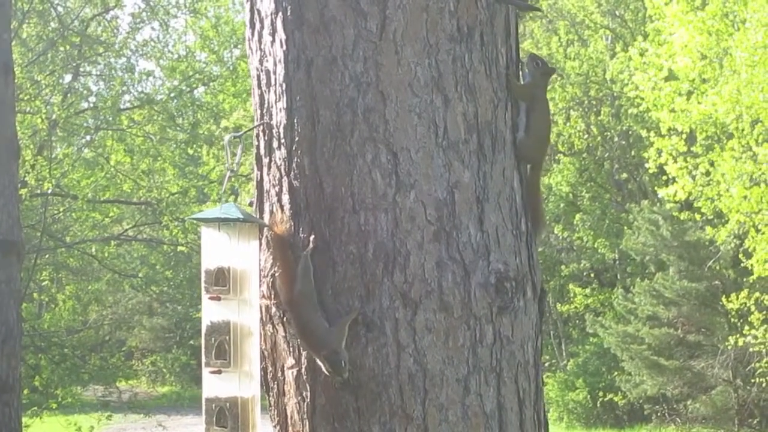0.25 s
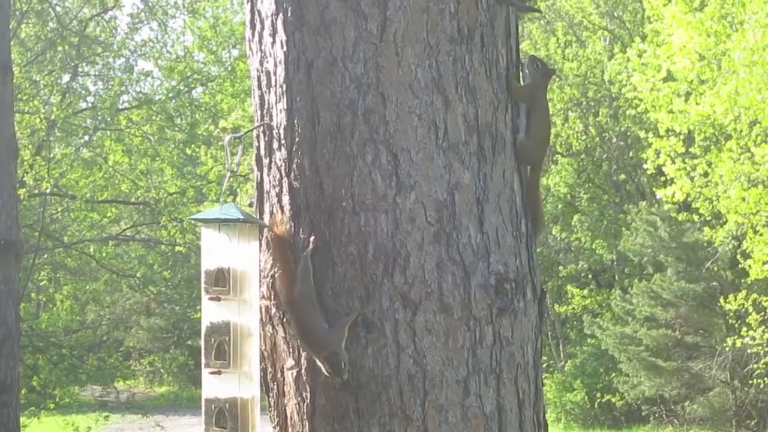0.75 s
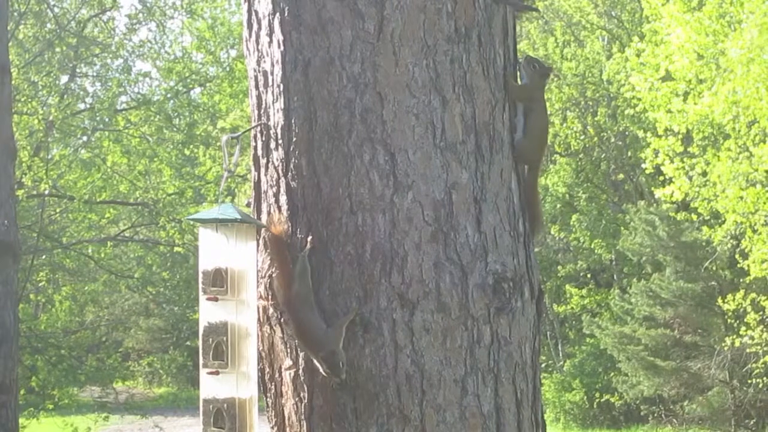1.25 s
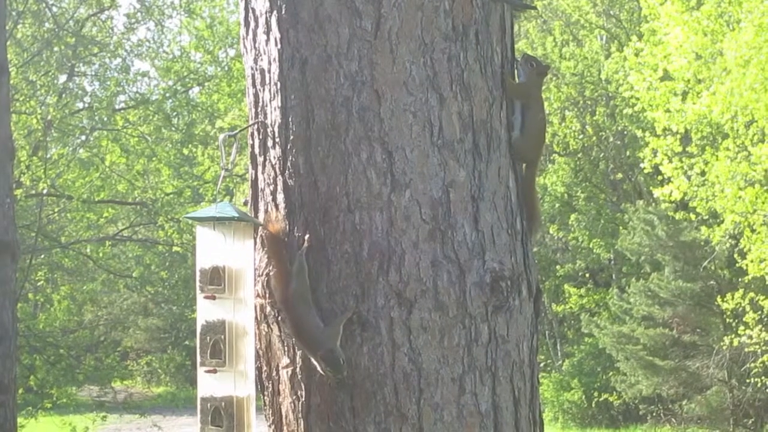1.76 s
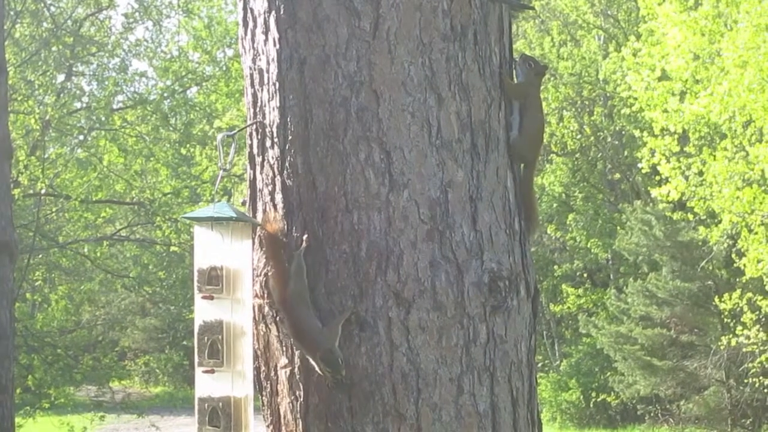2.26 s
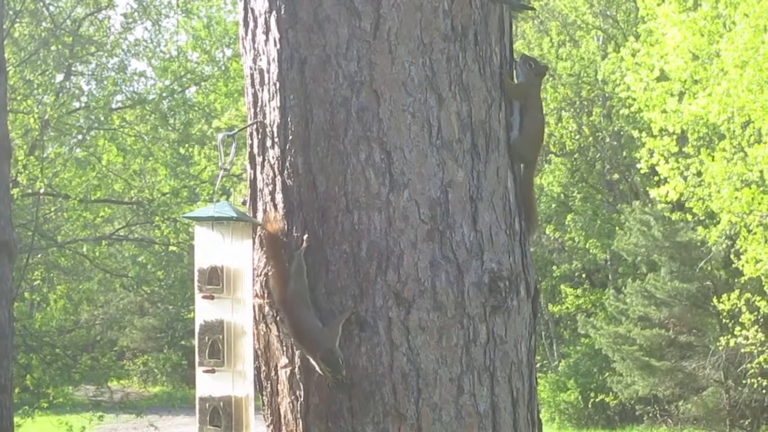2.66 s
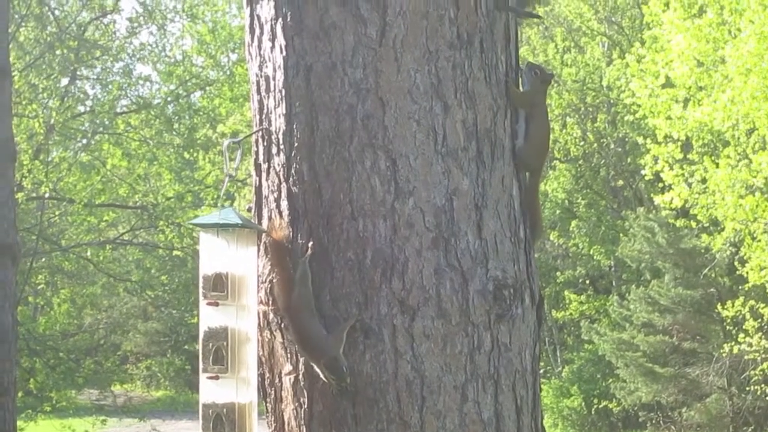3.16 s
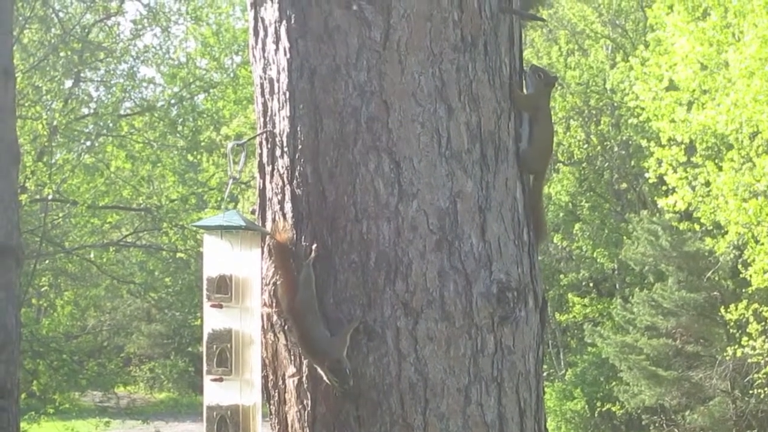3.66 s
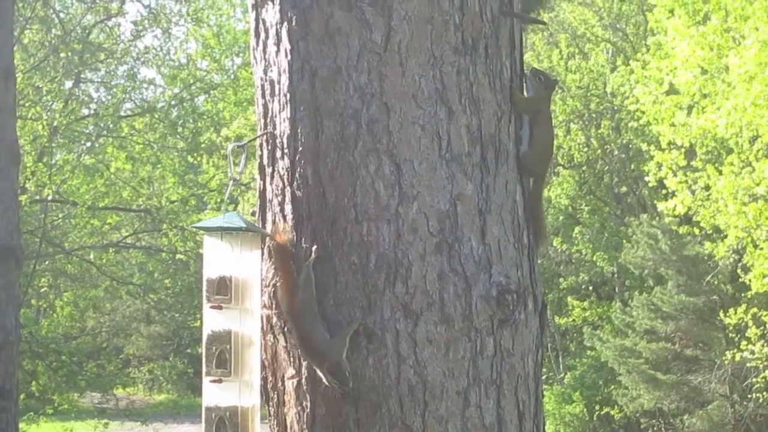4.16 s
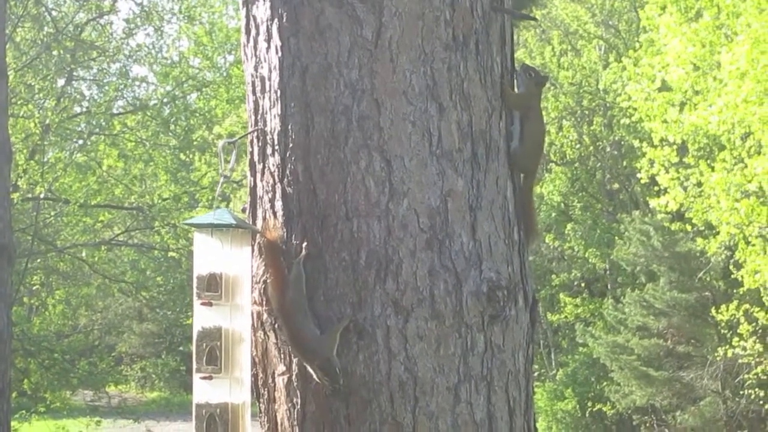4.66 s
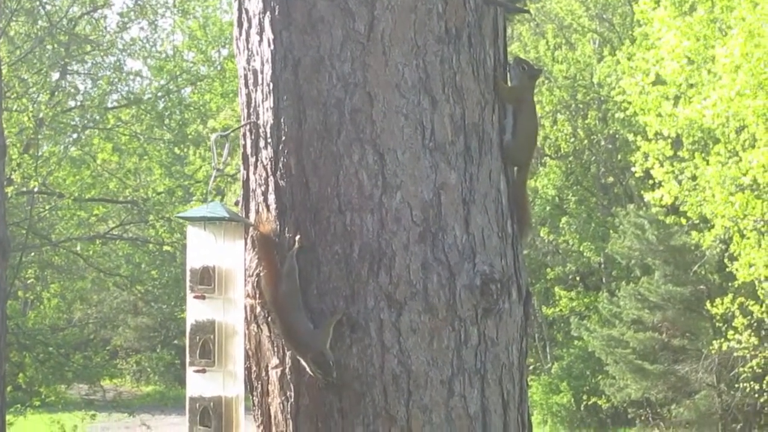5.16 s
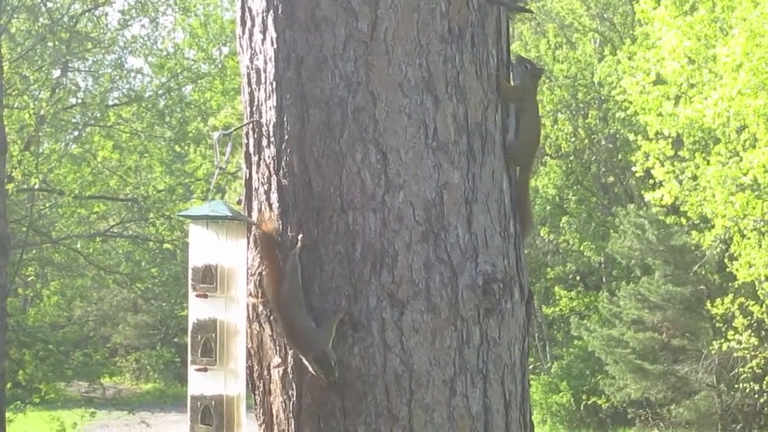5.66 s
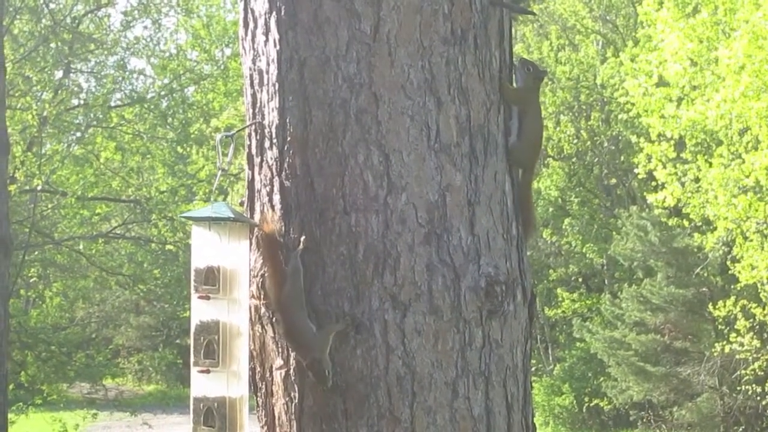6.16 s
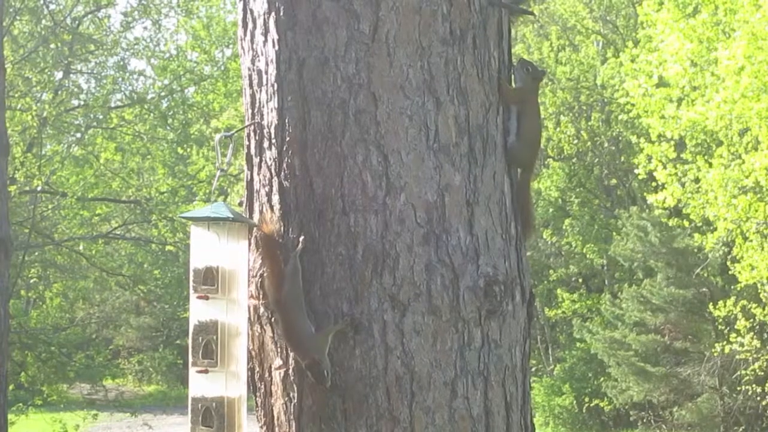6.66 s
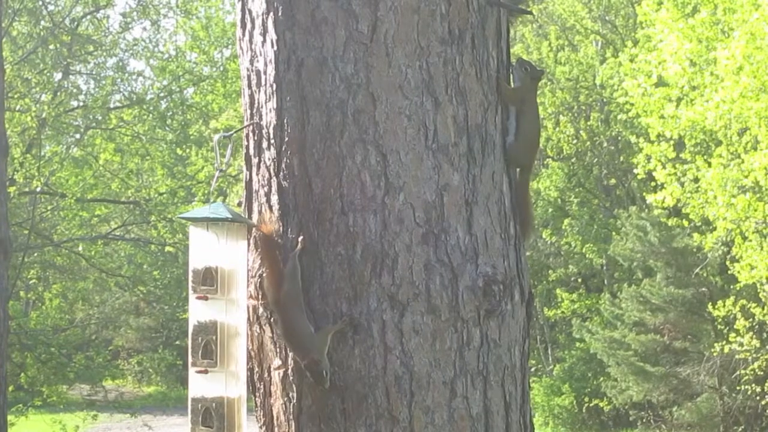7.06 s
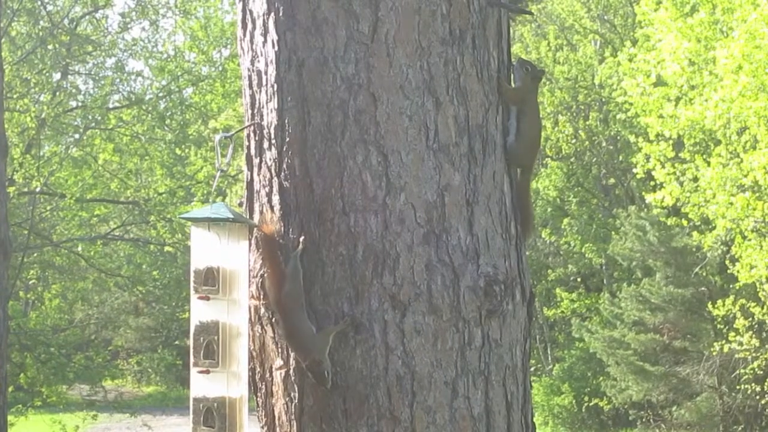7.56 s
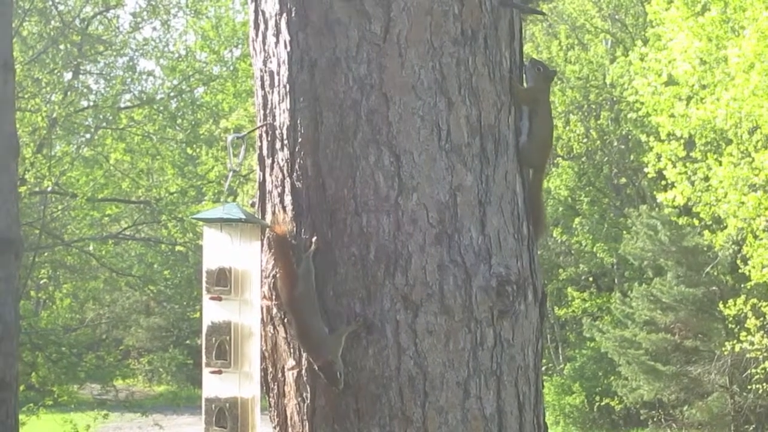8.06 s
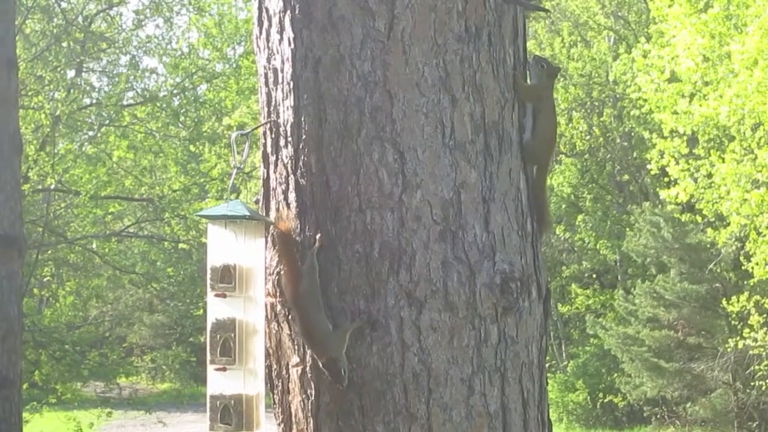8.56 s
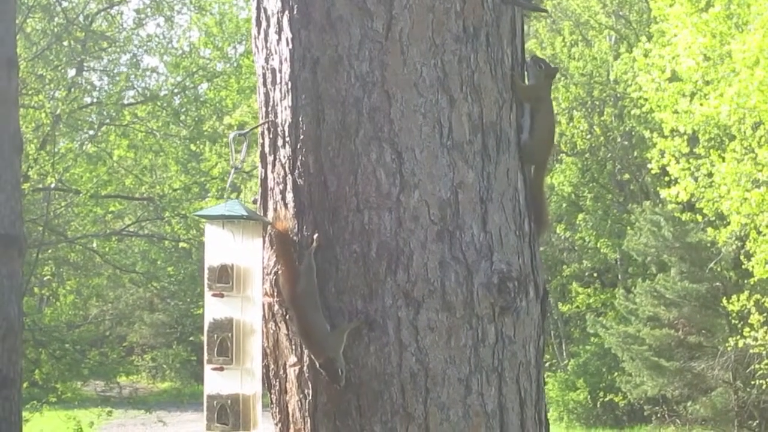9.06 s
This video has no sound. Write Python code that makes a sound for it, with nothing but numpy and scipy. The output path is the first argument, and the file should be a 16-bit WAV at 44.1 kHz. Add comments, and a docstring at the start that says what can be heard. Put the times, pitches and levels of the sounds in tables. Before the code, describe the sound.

Two squirrels scold with rapid hoarse chattering barks, later slower and led by thin squeaks, over faint leaf rustle, with one soft low wind thump.

```python
"""Squirrels scolding at the edge of a wood

Two squirrels trade short hoarse barks: vocal pulses and breath noise rung through throat resonances.
Thin squeaks, swept tones with overtones, lead in some barks; gliding sines make whistled notes, mostly
a bird's, and a faint high squeak sliding down. Early echoes and scattered noise tails give the trees'
long faint reply. Shaped noise makes the rustle and far hum, and the breeze that rumbles, gusts and
thumps on the two microphone ports.
"""
import sys
import numpy as np
from scipy import signal
from scipy.fft import rfft, irfft
from scipy.io import wavfile
from scipy.ndimage import uniform_filter1d

SR = 44100
rng = np.random.default_rng(int(sys.argv[2]) if len(sys.argv) > 2 else 0)


def transcribe(u):
    """Save the signal u as a 16-bit wav file named by the first command-line argument.

    u: samples, shape (n,) or (channels, n), limited to [-1, 1]; the rate is SR.
    q: integer samples, one column per channel.
    """
    v = np.clip(np.atleast_2d(u).T, -1, 1)
    q = np.round(v * 32767).astype(np.int16)
    wavfile.write(sys.argv[1], SR, q)


N = 410571
LEFT_RIGHT = np.array([[1], [-1]])   # opposite signs at the two ports


def amp(db):
    """Decibels to gain."""
    return 10 ** (np.asarray(db) / 20)


def rms_one(x):
    """Scale to unit rms."""
    return x / np.sqrt(np.mean(x ** 2) + 1e-20)


def shaped(x, points):
    """Filter by (frequency [Hz], level [dB]) points joined on a log frequency axis."""
    hz, db = np.transpose(points)
    axis = np.maximum(np.arange(N // 2 + 1) * SR / N, 1)
    return irfft(rfft(x) * amp(np.interp(np.log(axis), np.log(hz), db)), N)


def wobble(size, hz):
    """Slow random drift of spread 1: noise through a double one-pole low-pass."""
    r = np.exp(-2 * np.pi * hz / SR)
    warm_up = 2000
    noise = rng.standard_normal(size + warm_up)
    return rms_one(signal.lfilter([1], [1, -2 * r, r * r], noise)[warm_up:])


def resonance(x, hz, width):
    """Two-pole band-pass of gain about 1 at its centre."""
    r = np.exp(-np.pi * width / SR)
    zeros = np.array([1, 0, -1]) * (1 - r * r) / 2
    poles = [1, -2 * r * np.cos(2 * np.pi * hz / SR), r * r]
    return signal.lfilter(zeros, poles, x)


def add(track, s, sound):
    """Mix a sound in at a time in seconds."""
    i = round(s * SR)
    track[i:i + len(sound)] += sound[:N - i]


USUAL_MS, USUAL_DB = 20, -18   # the usual bark, against which the treble is reckoned
SPLIT_HZ = 5500                # throat resonances above this follow the brightness of each bark
TREBLE_FADE_DB = 2.5           # the treble weakens by this much along a bark
LEAD_S = .06                   # a bark this soon after a squeak is on the same breath
# a bark led by a squeak: swell (share of length), start (share of top pitch), duller treble, attack
LED_SWELL, LED_START, LED_TREBLE_DB, LED_ATTACK_MS = .6, .74, -2, 1


def barks(rows, throat, start, peak_ms, sag, jitter, shimmer_db, breath, uneven, smear, opening_ms, fall_ms,
          swell_share, bright_db, bright_per_db, dull_db_per_ms, attack_ms, end_share):
    """Uneven vocal pulses on an arched pitch, with breath noise, through the throat."""
    out = np.zeros(N)
    ms = np.arange(3000) / SR * 1000
    for s, length, level_db, top_hz in rows:
        led = any(0 < s - squeak[0] < LEAD_S for squeak in SQUEAKS)
        swell = length * (LED_SWELL if led else swell_share)
        attack = LED_ATTACK_MS if led else attack_ms
        # a slow swell opens softly, with the folds already tight
        onset = np.exp(-swell / opening_ms)
        first = LED_START if led else 1 - (1 - start) * np.clip(1.7 * onset, 0, 1)

        # harder barks are brighter, drawn-out ones duller
        treble_db = bright_db + bright_per_db * (level_db - USUAL_DB)
        treble_db += led * LED_TREBLE_DB - dull_db_per_ms * (length - USUAL_MS)

        # the folds slacken at the end and grow less regular along the call
        glide_ms = [0, min(peak_ms, .6 * length), .9 * length, 1.8 * length]
        glide = np.interp(ms, glide_ms, [first, 1, sag, .33])
        hoarse = np.clip(ms / length + 0.46, 0, 1.5)
        pitch = top_hz * glide * (1 + jitter * hoarse * wobble(len(ms), 385))
        phase = 2 * np.pi * np.cumsum(pitch) / SR

        # a softer closure spreads each pulse in time
        lags = smear * rng.standard_normal(14)
        harmonics = range(1, int(15000 // top_hz) + 1)
        pulses = rms_one(sum(np.cos(k * phase + lags[k]) for k in harmonics))
        # strong and weak pulses alternate: lines at half the pitch
        pulses *= 1 + uneven * np.cos(phase / 2)
        # air escapes once a cycle
        puffs = rng.standard_normal(len(ms)) * (1 + np.cos(phase))
        shimmer = amp(shimmer_db * hoarse * np.tanh(wobble(len(ms), 270)))
        source = (pulses + breath * hoarse * puffs) * shimmer
        source *= np.interp(ms, [0, attack, swell, length], [0, onset, 1, end_share])

        # the mouth is shaped a little differently each time
        gain_shift_db = 1.2 * rng.standard_normal(len(throat))
        tuning_shift = .01 * rng.standard_normal(len(throat))
        brightness_db = treble_db - TREBLE_FADE_DB * (np.minimum(ms / length, 1) - .5)
        closing = np.exp(-np.maximum(ms - length, 0) / fall_ms)
        voice = np.zeros(len(ms))
        for k, (hz, width, db) in enumerate(throat):
            # the low resonances are the last to fade as the mouth shuts
            fading = source * closing ** min(hz / 2000, 1)
            gain = (-1) ** k * amp(db + gain_shift_db[k] + brightness_db * (hz > SPLIT_HZ))
            voice += gain * resonance(fading, hz * (1 + tuning_shift[k]), width)
        # a side cavity weakens the band between the low resonances
        voice -= 0.49 * resonance(voice, 2010, 900)
        add(out, s, amp(level_db) * voice / np.sqrt(np.mean(voice[ms < length] ** 2)))
    return out


# near squirrel's barks: (time [s], length [ms], level [dB], top pitch [Hz])
NEAR_CALLS = [(.048, 19, -20, 1440), (.156, 20.3, -19, 1633), (.259, 21.7, -19.5, 1351),
              (.364, 19.7, -17, 1462), (.473, 22, -17, 1413), (.58, 24, -18.5, 1418), (.684, 27, -20, 1385),
              (.798, 25.4, -18.5, 1214), (.905, 19.2, -17.5, 1664), (1.01, 19.7, -18.5, 1388),
              (1.122, 16, -16.5, 1372), (1.229, 17, -17.5, 1375), (1.334, 14.4, -17, 1308),
              (1.434, 18, -20, 1367), (1.548, 19.8, -17, 1394), (1.678, 21, -20.5, 1220),
              (1.801, 19, -19, 1450), (1.918, 25, -19, 1422), (2.036, 22.3, -18.5, 1445),
              (2.172, 18.3, -17.5, 1657), (2.296, 20, -20, 1401), (2.415, 22.5, -18, 1688),
              (2.533, 19, -19, 1414), (2.655, 24.6, -16, 1654), (2.778, 20.5, -21.5, 1270),
              (2.897, 24, -16.5, 1662), (3.128, 22, -16, 1732), (3.229, 17.2, -19, 1391),
              (3.34, 20.6, -19, 1435), (3.463, 20, -21, 1356), (3.589, 26.8, -16, 1723),
              (3.712, 17.7, -23.5, 1295), (3.839, 14.3, -19, 1425), (3.941, 24, -19, 1450),
              (4.054, 20, -17, 1670), (4.176, 20, -23.5, 1220), (4.341, 27.6, -16, 1667),
              (4.694, 28.4, -16.5, 1670), (5.105, 26.8, -16.5, 1721), (5.374, 32, -16, 1721),
              (5.674, 27, -18, 1716), (6.032, 17.8, -21, 1350), (6.141, 18.6, -16.5, 1713),
              (6.239, 17, -20, 1378), (6.351, 20.3, -16, 1705), (6.467, 16.2, -18.5, 1287),
              (6.584, 21, -19, 1354), (6.891, 31.7, -17, 1727), (7.215, 26.5, -17.5, 1648),
              (7.7, 30, -18, 1676), (8.01, 25, -16.5, 1740), (8.152, 14, -27, 1360),
              (8.284, 30.4, -16, 1714), (8.432, 23.6, -21.5, 1278), (8.552, 21.5, -17, 1679),
              (8.688, 20, -18.5, 1405), (8.81, 19.8, -19.5, 1414), (8.968, 27, -15, 1733),
              (9.232, 22.7, -16, 1703)]
# near squirrel's throat resonances: (frequency [Hz], width [Hz], level [dB])
NEAR_RESONANCES = [(530, 133, -14), (936, 62, -5.5), (1370, 414, -10.5), (3185, 544, 2.5),
                   (4080, 1250, -3.5), (5310, 1350, -11.5), (7250, 900, -2.5), (9970, 5900, -10),
                   (12450, 970, -3.5)]


def near_squirrel():
    """A rough voice: pitch jitter and much breath, brighter the harder it barks."""
    return barks(NEAR_CALLS, NEAR_RESONANCES, start=.6, peak_ms=11, sag=1.0, jitter=0.0593, shimmer_db=2.5,
                 breath=0.57, uneven=0.066, smear=0.45, opening_ms=18, fall_ms=5.9, swell_share=0.3835,
                 bright_db=-0.55, bright_per_db=0.67, dull_db_per_ms=0.05, attack_ms=0.24, end_share=0.47)


# far squirrel's barks: (time [s], length [ms], level [dB], top pitch [Hz])
FAR_CALLS = [(.008, 22.4, -25.5, 1830), (.128, 19, -24, 1570), (1.175, 7.8, -31.5, 1290),
             (1.287, 19, -29.5, 1890), (1.511, 15, -38.5, 1520), (1.615, 22, -23, 1684),
             (1.721, 24, -25, 1770), (1.826, 17, -27, 1830), (2.399, 23, -33, 1690),
             (2.513, 22, -24.5, 1980), (2.626, 17, -23, 1824), (2.758, 7.7, -32, 1800),
             (3.006, 22, -48, 1420), (3.41, 27, -17.5, 1737), (3.828, 16, -24.5, 1800),
             (4.462, 18.7, -24, 1900), (4.584, 21, -29.5, 1660), (4.854, 10, -37.5, 1870),
             (5.936, 23.5, -19.5, 1695), (6.557, 21, -37, 1570), (6.666, 17, -35, 1260),
             (6.72, 16, -35, 1625), (6.777, 9.9, -28.5, 1520), (7.523, 27, -17.5, 1700),
             (7.964, 6.4, -31.5, 1970), (8.211, 10.5, -32, 1580), (8.66, 17, -30, 1170),
             (8.756, 15.3, -21.5, 1980), (8.87, 6.2, -32, 1860), (9.085, 8, -28.5, 1570)]
# far squirrel's throat resonances: (frequency [Hz], width [Hz], level [dB])
FAR_RESONANCES = [(1904, 430, -6.5), (3354, 510, 6.5), (4040, 1160, -3), (7150, 1560, -0.5),
                  (8370, 2600, -5.5), (9820, 2100, -8.5)]


def far_squirrel():
    """A steadier pitch with a slower swell and pulses that alternate more in strength."""
    return barks(FAR_CALLS, FAR_RESONANCES, start=0.84, peak_ms=14.1, sag=.88, jitter=0.027, shimmer_db=3.0,
                 breath=0.42, uneven=.2, smear=0.85, opening_ms=17.8, fall_ms=5.5, swell_share=0.6,
                 bright_db=5.0, bright_per_db=0.08, dull_db_per_ms=0.23, attack_ms=1.3, end_share=0.74)


# squeaks: (time [s], low onset held [ms], under 0 starts further up the arch, top pitch [Hz], level [dB])
SQUEAKS = [(3.376, -9, 5130, -32), (4.307, 1.5, 5530, -27), (4.659, .6, 5500, -25.5), (5.069, 0, 5470, -25),
           (5.341, 5, 5340, -28), (5.636, 6, 5390, -27), (6.862, 0.5, 5440, -26), (7.178, 2, 5520, -27),
           (7.445, 4, 5370, -29), (7.667, 1, 5390, -27), (7.975, 3.5, 5520, -26), (8.935, 1.5, 5660, -24),
           (9.194, 2.5, 5590, -27)]
SQUEAK_MS = 29.2   # a squeak with a negative hold is shorter by half of it


def squeaks():
    """A clean whistle that may catch low, leaps up, arches and drops; its octave is strong."""
    out = np.zeros(N)
    for s, hold, top_hz, level_db in SQUEAKS:
        length = SQUEAK_MS + min(hold, 0) / 2
        ms = np.arange(int(length * SR / 1000)) / SR * 1000
        along = np.clip((ms - hold) / (length - hold), 0, 1)
        arch = np.interp(along, [0, .06, .2, .5, .75, .9, 1], [.62, .87, .965, 1, .98, .9, .7])
        phase = 2 * np.pi * np.cumsum(top_hz * arch) / SR
        # the octave is strongest at the top of the arch; the third harmonic sounds only when low
        octave = amp(-1 - 80 * np.minimum(1 - arch, .17)) * np.sin(2 * phase)
        third = amp(-20) * np.sin(3 * phase) * (arch < .7)
        tone = np.sin(phase) + octave + third
        fades = np.clip(np.minimum(ms / 2.5, (length - ms) / 3.5), 0, 1)
        shape = fades * amp(1.5 * wobble(len(ms), 200))
        # the low onset sits on the throat resonance
        lift = uniform_filter1d(amp(6.6 * (ms < hold + 1)), size=40)
        add(out, s, amp(level_db) * np.sqrt(2) * tone * shape * lift)
    return out


# whistled notes, mostly a bird's, and a faint high squeak sliding down:
# (time [s], length [s], first pitch [Hz], middle pitch [Hz], last pitch [Hz], level [dB])
WHISTLED_NOTES = [(0.44, 0.11, 2460, 2367, 2050, -35), (2.439, 0.068, 2750, 2290, 2470, -38),
                  (2.574, 0.12, 2470, 2640, 2230, -39), (2.94, 0.046, 2450, 2480, 2630, -40),
                  (3.001, 0.062, 2940, 2780, 2780, -33), (3.061, 0.029, 2440, 2486, 2510, -30.5),
                  (3.526, 0.055, 2500, 2140, 1900, -33.5), (3.99, 0.04, 1910, 2120, 2350, -39.5),
                  (4.057, 0.034, 2560, 2310, 2000, -31), (4.448, 0.049, 2250, 2720, 2300, -36),
                  (4.57, 0.034, 2100, 2690, 2250, -33), (4.512, 0.064, 2680, 3000, 3250, -47),
                  (8.267, .04, 6000, 5650, 5300, -48), (8.483, 0.082, 4800, 4400, 4000, -47),
                  (8.858, .075, 5740, 5070, 4480, -45)]
NOTE_FADE_DB = 9.5                    # a note weakens by this much along its length
NOTE_ECHO_MS, NOTE_ECHO_DB = 21, -3   # a hard surface nearby repeats each note


def whistles():
    """Short gliding sines that waver in pitch and strength, each with a close echo."""
    out = np.zeros(N)
    for s, length, first_hz, middle_hz, last_hz, level_db in WHISTLED_NOTES:
        along = np.linspace(0, 1, int(length * SR))
        # a parabola through the three pitches
        line = first_hz + (last_hz - first_hz) * along
        bend = line + (2 * middle_hz - first_hz - last_hz) * 2 * along * (1 - along)
        pitch = bend * (1 + 0.017 * wobble(len(along), 160))
        swell = np.sqrt(2 * np.sin(np.pi * along).clip(0))
        shape = swell * amp(1.6 * wobble(len(along), 46) - NOTE_FADE_DB * along)
        note = amp(level_db) * shape * np.sin(2 * np.pi * np.cumsum(pitch) / SR)
        add(out, s, note)
        add(out, s + NOTE_ECHO_MS / 1000, amp(NOTE_ECHO_DB) * note)
    return out


# early echoes off trunk, ground, wall and far wall: (delay [ms], level [dB], side [-1 right to 1 left])
EARLY_ECHOES = [(6.97, -18, 0.28), (21, -22, -0.16), (38.3, -36.5, .3), (87, -33, -0.21)]
# dying scatter off near foliage and far trees: (time to fall 60 dB [s], level [dB])
SCATTER_TAILS = [(0.119, -10), (.9, -19.5)]
SCATTER_WIDENS_S = 0.01   # the scatter first comes from straight ahead, later from all round


def woodland_echo(x, spread, wet_db, pan_db, lag):
    """Early echoes and two noise tails off leaves and trunks; short waves differ most between ports."""
    t = np.arange(SR) / SR
    mid, side = rng.standard_normal((2, SR))
    widening = np.clip(t / SCATTER_WIDENS_S, 0, 1)
    noise = mid + spread * widening * np.diff(side, prepend=0) * LEFT_RIGHT
    decay = sum(amp(db) * np.sqrt(2 * np.log(1000) / t60 / SR) * amp(-60 * t / t60)
                for t60, db in SCATTER_TAILS)
    response = decay * noise * np.clip(t / 0.0009, 0, 1)
    # leaves and air dull the scatter
    response = signal.lfilter([.6], [1, -.4], response)
    for ms, db, aside in EARLY_ECHOES:
        response[:, round(ms * SR / 1000)] += amp(db) * (1 + aside * np.array([1, -1]))
    # lag in samples: the left port hears the sound a little earlier, the right a little later
    direct = (x + lag * np.diff(x, prepend=0) * LEFT_RIGHT) * amp(pan_db / 2 * LEFT_RIGHT)
    return direct + amp(wet_db) * signal.fftconvolve(x[None], response, axes=1)[:, :N]


# spectrum of leaves and far air: (frequency [Hz], relative level [dB per Hz])
WOOD_SPECTRUM = [(100, -2), (250, -6), (390, -14), (580, -6.5), (1000, -10.5), (1200, -12), (2000, -17.5),
                 (15000, -40)]
WOOD_DB = -42


def wood(spread):
    """Steady rustle and far hum: shaped noise with a part in opposite phase at the two ports."""
    noise = rms_one(shaped(rng.standard_normal((2, N)), WOOD_SPECTRUM))
    return amp(WOOD_DB) * (noise[0] + spread * noise[1] * LEFT_RIGHT)


def across_ports(spectrum):
    """Wind noise mostly in opposite phase at the two ports and stronger on the right."""
    low = rms_one(shaped(rng.standard_normal((3, N)), spectrum))
    return low[0] * [[-1.9], [3.4]] + low[1:]


# breeze strength before the port weights: (time [s], level [dB])
BREEZE_STRENGTH = [(6.3, -74), (7.1, -64), (7.9, -52), (8.1, -35.5), (8.3, -40), (8.36, -30), (8.52, -27.5),
                   (8.6, -37), (8.85, -53), (9.31, -56)]
# sudden buffets before the port weights: (time [s], level [dB])
SUDDEN_THUMPS = [(7.34, -38), (8.26, -26.5)]
THUMP_RISE_DB_PER_S, THUMP_FALL_DB_PER_S = 400, 230
# spectrum of the gusts: (frequency [Hz], relative level [dB per Hz])
GUST_SPECTRUM = [(15, -44), (40, 0), (85, 0), (150, -6.5), (250, -19.5), (500, -61)]
# spectrum of the steady air: (frequency [Hz], relative level [dB per Hz])
RUMBLE_SPECTRUM = [(30, -30), (60, -29), (110, 10.5), (170, 12), (260, -17), (400, -3.5), (800, -31)]
RUMBLE_DB = -51   # before the port weights


def wind():
    """A steady rumble, and deeper, lumpy buffeting when the breeze picks up or thumps."""
    t = np.arange(N) / SR
    strength = amp(np.interp(t, *np.transpose(BREEZE_STRENGTH)))
    for s, level_db in SUDDEN_THUMPS:
        drop_db = np.maximum(THUMP_RISE_DB_PER_S * (s - t), THUMP_FALL_DB_PER_S * (t - s))
        strength = strength + amp(level_db - drop_db)
    lumps = amp(3.9 * wobble(N, 11.6))
    gusts = across_ports(GUST_SPECTRUM) * strength * lumps
    return gusts + amp(RUMBLE_DB) * across_ports(RUMBLE_SPECTRUM)


def scene():
    """Both squirrels and the more distant whistles among the echoes, over wood and wind."""
    near = woodland_echo(near_squirrel() + squeaks(), spread=0.59, wet_db=-1.05, pan_db=-0.97, lag=0.047)
    far = woodland_echo(far_squirrel(), spread=0.85, wet_db=-2.5, pan_db=-.8, lag=0.077)
    whistled = woodland_echo(whistles(), spread=0.75, wet_db=5.5, pan_db=1, lag=0)
    return near + far + whistled + wood(spread=0.55) + wind()


# cavity behind the left port: (frequency [Hz], width [Hz], added gain [ratio])
PORT_CAVITY = (12600, 540, 0.89)
# microphone response: (frequency [Hz], level [dB])
MIC_RESPONSE = [(28, -18), (58, -8), (85, -0.5), (11500, -2), (13000, -7), (14500, -3.5), (16500, -29)]
CUTOFF_HZ = 16600


def record(dry):
    """A cavity lifts a high band left and dips it right; bass and treble roll off and the top is cut."""
    hz, width, gain = PORT_CAVITY
    ring = gain * resonance(dry, hz, width)
    ports = dry + ring * [[1], [-.6]]
    top_cut = signal.cheby2(12, 70, CUTOFF_HZ, fs=SR, output="sos")
    return signal.sosfilt(top_cut, shaped(ports, MIC_RESPONSE))


dry = scene()
out = record(dry)
transcribe(out)
```